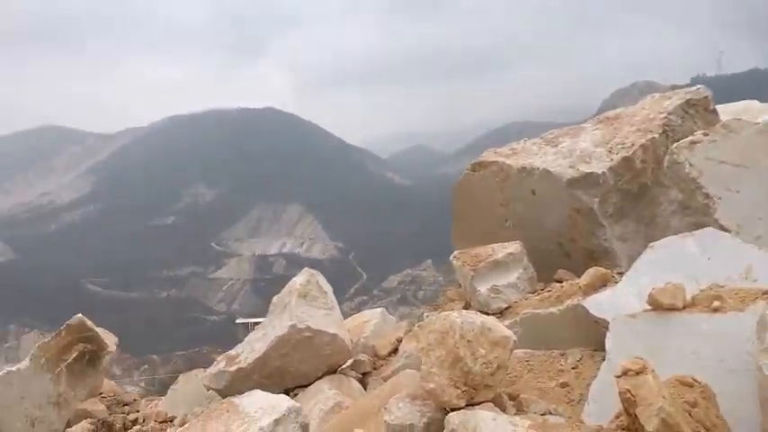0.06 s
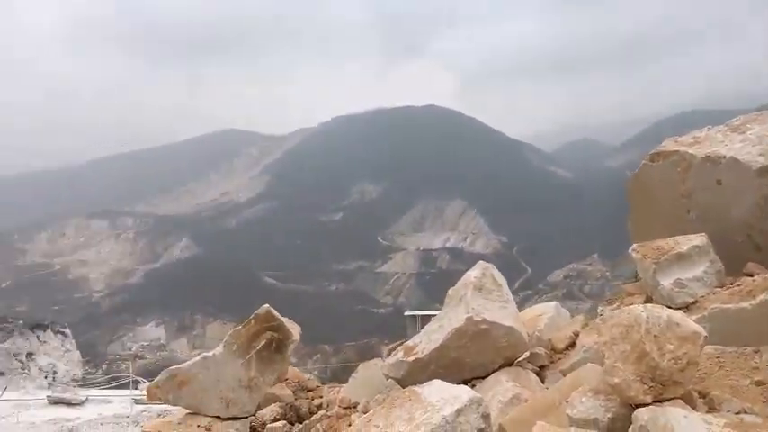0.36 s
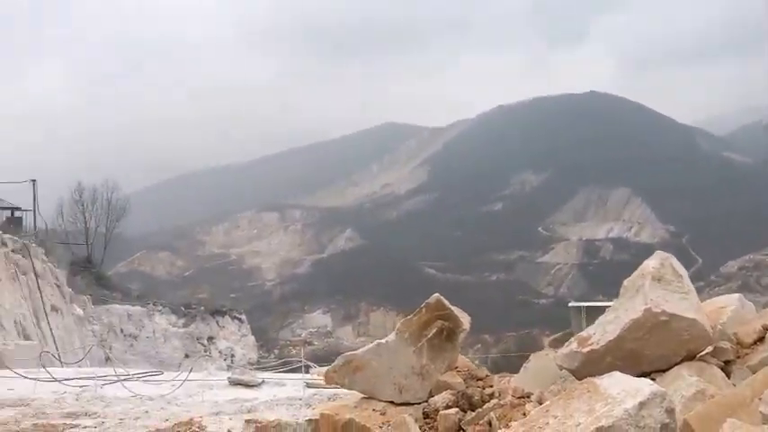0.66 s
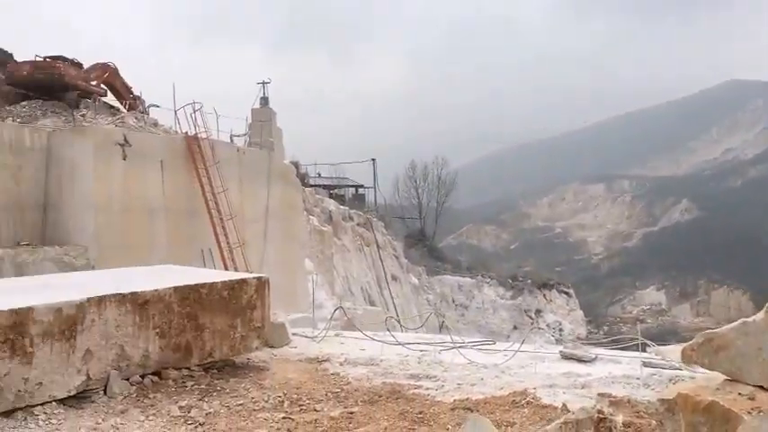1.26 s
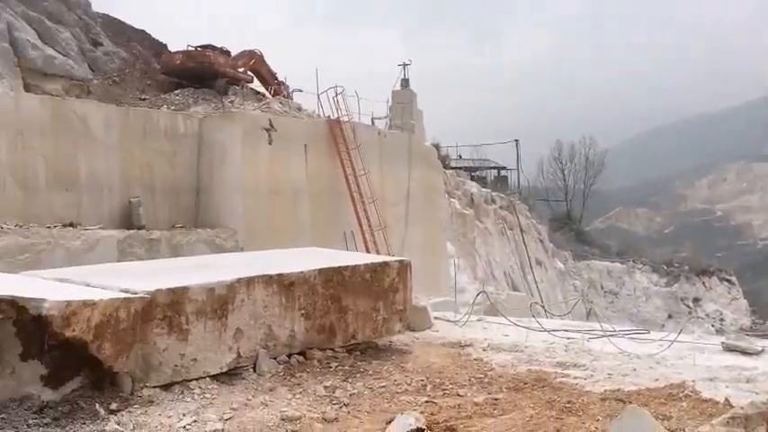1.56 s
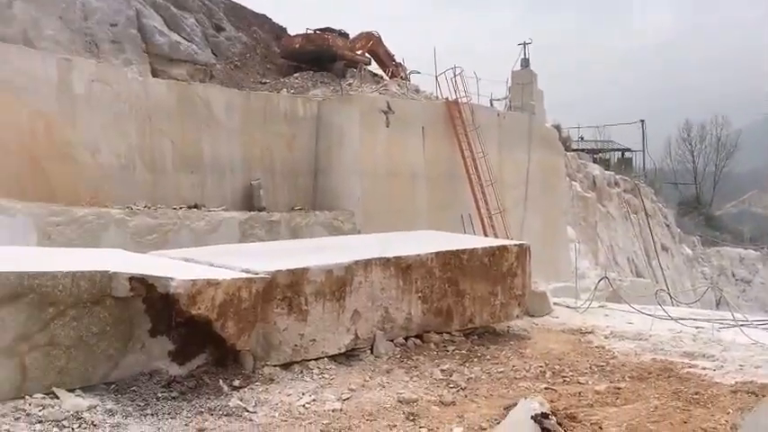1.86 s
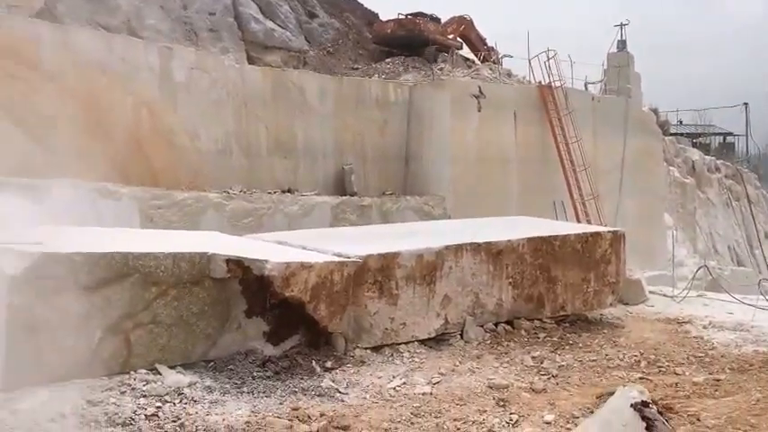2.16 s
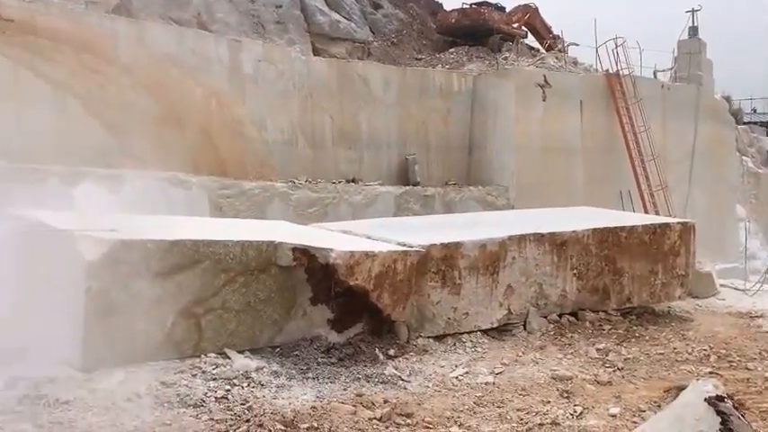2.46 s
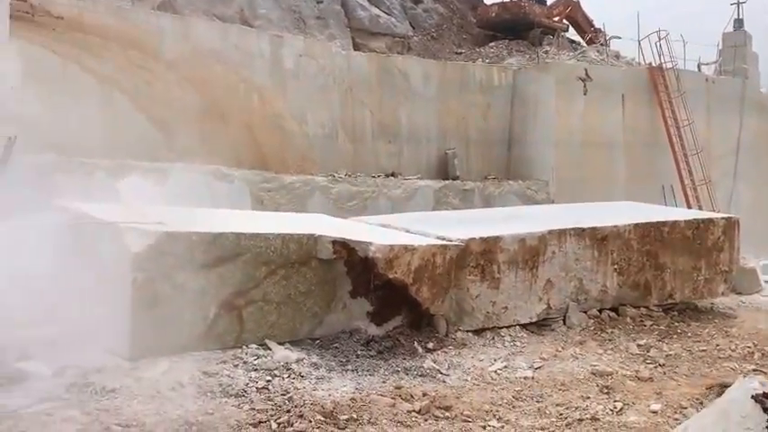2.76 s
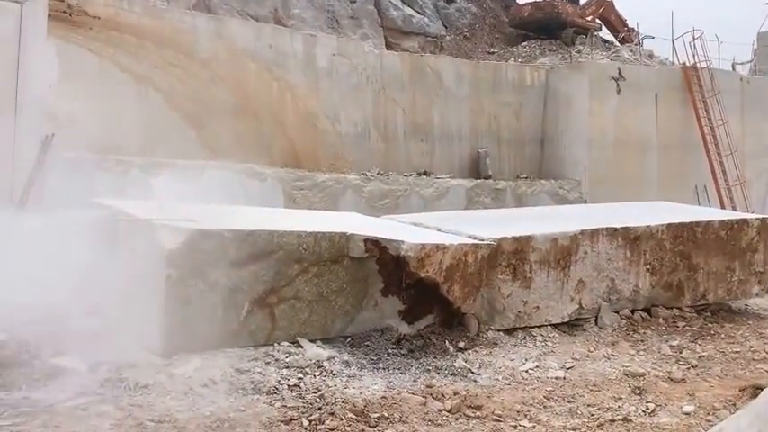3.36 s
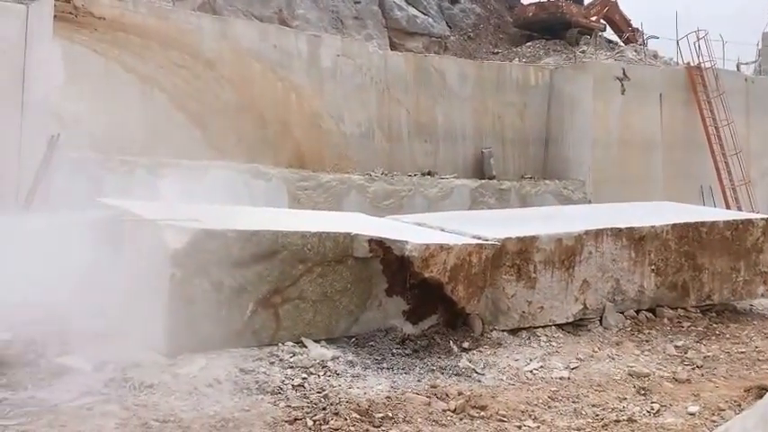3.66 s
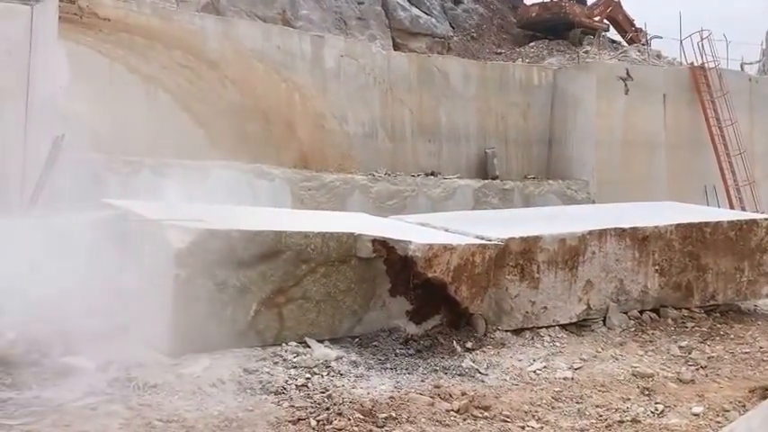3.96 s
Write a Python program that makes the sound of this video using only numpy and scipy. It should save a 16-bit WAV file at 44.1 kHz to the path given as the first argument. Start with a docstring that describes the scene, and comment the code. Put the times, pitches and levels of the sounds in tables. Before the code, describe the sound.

Stone-cutting machines roar throughout in an open quarry, heavy motors throbbing about three times a second over hum and wind rumble. A two-toned saw whine swells and fades, stronger from about 2 seconds. Between 0.7 and 2 seconds the spray hiss grows louder and brighter as the microphone turns. A brief low note swells just after 2 seconds, and the saw grinds slightly harder near 2.5 and 3 seconds.

```python
"""Stone-cutting machines run in an open quarry. From the start two heavy drives at slightly different
speeds beat against each other, the saw whines over the broadband roar of the cut, frames hum and wind
rumbles; now and then the treble drops out for an instant. As the microphone turns towards the cut,
the hiss of its spray grows louder and brighter. Just after 2 s a low note swells and fades, then the
saw bites harder twice, and near 3.3 s a speck of grit ticks."""
import sys
import numpy as np
from scipy import signal
from scipy.fft import rfft, irfft, next_fast_len
from scipy.io import wavfile
from scipy.ndimage import uniform_filter1d, map_coordinates

SR = 44100
rng = np.random.default_rng(int(sys.argv[2]) if len(sys.argv) > 2 else 0)


def wav_out(sig):
    """Save sig, one row per channel (or a flat mono array), as 16-bit PCM at SR to the path in sys.argv[1]."""
    wavfile.write(sys.argv[1], SR, np.round(np.clip(np.atleast_2d(sig).T, -1, 1) * 32767).astype(np.int16))


N = 176400

DRIVE_HZ, BEAT_HZ, IN_STEP_S = 39.55, 2.96, .19
# Harmonics of the slower and the faster drive: order, level/dB between chugs
SLOW_HARMONICS = [(1, -36), (2, -45), (4, -57)]
FAST_HARMONICS = [(1, -36.3), (3, -58), (5, -58)]
def drives():
    """Beating: two drives fall in and out of step at the difference of their frequencies."""
    out = np.zeros(N)
    for hz, harmonics in (DRIVE_HZ, SLOW_HARMONICS), (DRIVE_HZ + BEAT_HZ, FAST_HARMONICS):
        phase = 2 * np.pi * hz * (clock() - IN_STEP_S) + .033 * wobble(5.47)
        for order, db in harmonics:
            out += np.sqrt(2) * amp(db + .5 * wobble(22)) * np.cos(order * phase)
    return out * amp(chug_db())


# Chugs of the drives: t/s, lift/dB
CHUGS = [(.2, 6), (.45, 7), (.555, 5), (.812, 8.5), (.91, 6.5), (1.17, 8.5), (1.53, 4), (1.64, 6.5),
         (1.779, 10.5), (1.875, 3.5), (2.159, 10), (2.26, 6), (2.52, 4.5), (2.63, 9.5), (2.87, 3),
         (3.16, 2), (3.25, 5), (3.61, 7), (3.69, 11.5), (3.87, 4.5), (3.965, 6.5)]
def chug_db():
    """Amplitude modulation: short lifts of the bass, in dB, break the throb into chugs."""
    return sum(db * gaussian(clock(), s, width=.031) for s, db in CHUGS)


# The cut as the microphone turns to it: t/s, roar level/dB, hiss level/dB before treble shading
FACING = [(0, -42, -54), (.7, -42, -53.5), (1.3, -41, -51.5), (2.1, -40, -51), (2.9, -40, -50.5),
          (4, -39, -51)]
# Spectra of the roar and of the spray: f/Hz, relative spectral level/dB
ROAR_SPECTRUM = [(100, -13.5), (170, 0.5), (210, -3.5), (270, 1), (335, 1.5), (420, -5), (620, -4.5),
                 (780, -8.5), (900, -4), (1090, -6.5), (1260, -4.5), (1420, -7), (1750, -7), (2100, -11.5),
                 (2480, -14.5), (2750, -20.5), (4000, -24), (5000, -41), (9000, -78)]
SPRAY_SPECTRUM = [(1200, -3.5), (2700, 1.5), (3800, 1), (4500, 1), (4900, -2.5), (5600, 0.5), (6900, 0),
                  (7600, -2.5), (8400, -1), (9800, -4.5), (10350, -7.5), (10900, -4.5), (12200, -6),
                  (13500, -10.5), (15700, -14.5)]
def cutting():
    """Directivity: ground stone roars and spray hisses, louder and brighter when faced."""
    roar_db, hiss_db = curves(FACING)
    roar = amp(roar_db + .2 * wobble(18)) * rock_echoes(rush(ROAR_SPECTRUM, patchy_db=.8))
    hiss = amp(hiss_db) * rock_echoes(rush(SPRAY_SPECTRUM, patchy_db=1.5))
    off_axis_db = hiss_db - hiss_db.max()
    hiss += (amp(.62 * off_axis_db) - 1) * treble(hiss, edge_hz=3700, order=16)
    top_db = .22 * off_axis_db + .8 * wobble(7)
    return roar + hiss + (amp(top_db) - 1) * treble(hiss, edge_hz=5700, order=6)


# The two main tones of the saw: f/Hz
SAW_HZ = [921.5, 989.3]
# Envelopes of the lower and the upper tone: t/s, level/dB
LOW_ENVELOPE = [(0, -56), (.35, -52.5), (.65, -55), (1.1, -48.5), (1.8, -52.5), (2.02, -43), (2.25, -46),
                (2.68, -52), (3.05, -44), (3.25, -48), (3.7, -56), (4, -46.5)]
HIGH_ENVELOPE = [(0, -54), (.7, -55.5), (.97, -59), (1.3, -49), (1.8, -56), (1.96, -43.5), (2.1, -64),
                 (2.53, -48), (2.8, -60), (3.1, -49), (3.45, -61), (3.68, -47.5), (4, -64)]
# Fainter tones of the cut: f/Hz, level/dB relative to the roar
FAINT_PARTIALS = [(1147, -20.5), (1237, -16.5), (1252, -25), (1616, -19), (1822, -26), (2222, -28.5),
                  (3694, -31)]
def saw_whine():
    """Resonance: the saw sings in the cut on two tones that swell and fade, and on fainter ones."""
    main = faint = 0
    for hz, envelope in zip(SAW_HZ, (LOW_ENVELOPE, HIGH_ENVELOPE)):
        gain = amp(curves(envelope)[0])
        main += gain * tone(hz, drift_rad=.45, drift_rate=11, waver_db=1, waver_rate=21)
    for hz, db in FAINT_PARTIALS:
        faint += amp(db) * tone(hz, drift_rad=1, drift_rate=13, waver_db=.5, waver_rate=7.7)
    roar_db = curves(FACING)[0]
    return main + amp(roar_db) * faint


# The saw bites harder: t/s, lift/dB
BITES = [(2.45, 3.5), (3.05, 2.5)]
# Resonances of the cut: f/Hz, half width/Hz, level/dB when fully faced and between bites
CUT_RESONANCES = [(680, 112, -52.5), (1251, 36, -51.5), (2146, 350, -54)]
def grinding():
    """Noise-driven resonance: hollow bands stand out as the cut is faced and swell with each bite."""
    roar_db = curves(FACING)[0]
    off_axis_db = 2.5 * (roar_db - roar_db.max())
    bite_db = sum(db * gaussian(clock(), s, width=.06) for s, db in BITES)
    bands = sum(amp(db) * noise_band(hz, width) for hz, width, db in CUT_RESONANCES)
    return bands * amp(off_axis_db + bite_db)


# Tones of further motors and of the machine frames: f/Hz, level/dB
MOTOR_TONES = [(50.6, -47.5), (53, -52), (62.6, -46), (75, -49), (106, -48.5), (137.5, -54)]
FRAME_TONES = [(174.8, -51.5), (190, -53), (237, -63), (250.4, -54.5), (257, -55), (273.5, -49),
               (290, -64.5), (317.4, -55.5), (527.6, -58.5), (593.5, -61.5), (672.9, -65.5), (823.6, -59)]
def hum():
    """Forced vibration: motors give steady low tones, the machine frames less steady ones."""
    motors = sum(amp(db) * tone(hz, drift_rad=.21, drift_rate=4.7, waver_db=2.5, waver_rate=4.37)
                 for hz, db in MOTOR_TONES)
    frames = sum(amp(db) * tone(hz, drift_rad=.66, drift_rate=6, waver_db=2, waver_rate=7)
                 for hz, db in FRAME_TONES)
    return motors + frames


# Rumble of wind and machinery: f/Hz, relative spectral level/dB
RUMBLE_SPECTRUM = [(15, -27), (24, -42), (33, -33), (50, -6), (75, -2.5), (110, -6), (145, -13.5),
                   (220, -26.5), (500, -40), (1500, -79)]
def rumble(level_db=-36.3, gust_db=1.0, throb_db=2.3, chug_share=.5):
    """Modulated noise: wind and machinery rumble, more so with the drives in step and in each chug."""
    throb = np.cos(2 * np.pi * BEAT_HZ * (clock() - IN_STEP_S))
    lift_db = gust_db * wobble(25) + throb_db * throb + chug_share * chug_db()
    return amp(level_db) * unit(rush(RUMBLE_SPECTRUM, patchy_db=-.5) * amp(lift_db))


def boom(at_s=2.072, hz=219, level_db=-35):
    """Tone burst: a low note swells and fades once under a Gaussian envelope."""
    carrier = np.sqrt(2) * np.sin(2 * np.pi * hz * clock())
    return amp(level_db) * gaussian(clock(), at_s, width=.036) * carrier


def grit_tick(at_s=3.282, level_db=-41.5, t60_s=.008):
    """Damped transient: a speck of grit near the microphone gives a bright, fast-decaying click."""
    age = clock() - at_s
    envelope = amp(level_db - 60 * np.abs(age) / t60_s) * (age > 0)
    return envelope * noise_band(11500, width_hz=2200)


def rock_echoes(x, ripple_db=1.76, spacing_hz=45.44):
    """Interference: echoes from the rock faces ripple the spectrum; the result has rms 1."""
    knots = ripple_db * rng.standard_normal(4096)
    return unit(filtered(x, lambda f: amp(map_coordinates(knots, [f / spacing_hz], mode="mirror"))))


def tone(hz, drift_rad, drift_rate, waver_db, waver_rate):
    """Scintillation: a tone of rms 1 wavers in phase and level on its way through moving air."""
    phase = 2 * np.pi * (hz * clock() + rng.random()) + drift_rad * wobble(drift_rate)
    return unit(np.sin(phase) * amp(waver_db * wobble(waver_rate)))


def rush(spectrum, patchy_db):
    """Spectral shaping: coloured noise of rms 1, its gain patchy in time and frequency."""
    cells = signal.stft(rng.standard_normal(N), nperseg=512)[2]
    patches = uniform_filter1d(rng.standard_normal(cells.shape), size=5, axis=0)
    patches = uniform_filter1d(patches, size=14, axis=1)
    noise = signal.istft(cells * amp(patchy_db * unit(patches)), nperseg=512)[1][:N]
    hz, db = np.transpose(spectrum)
    return unit(filtered(noise, lambda f: amp(np.interp(np.log(f + 1), np.log(hz), db))))


def noise_band(hz, width_hz):
    """Band-pass filtering: noise of rms 1 around hz."""
    return unit(filtered(rng.standard_normal(N), lambda f: gaussian(f, hz, width_hz)))


def treble(x, edge_hz, order):
    """High-pass filtering: the part of x above an edge."""
    return filtered(x, lambda f: 1 - 1 / (1 + (f / edge_hz) ** order))


def filtered(x, response):
    """Linear filtering: the spectrum of x times a frequency response."""
    size = next_fast_len(N + SR // 2)
    return irfft(rfft(x, size) * response(np.fft.rfftfreq(size, 1 / SR)), size)[:N]


def wobble(rate):
    """Spline interpolation: a smooth random curve, rate knots a second."""
    return map_coordinates(rng.standard_normal(1024), [clock() * rate], mode="mirror")


def curves(rows):
    """Linear interpolation: one value per sample for each column after the time."""
    times, *columns = np.transpose(rows)
    return [np.interp(clock(), times, column) for column in columns]


def gaussian(x, centre, width):
    """Gaussian window: 1 at the centre, 1/e one width away."""
    return np.exp(-((x - centre) / width) ** 2)


def amp(db):
    """Decibel law: level to amplitude ratio."""
    return 10 ** (np.asarray(db) / 20)


def unit(x):
    """Normalisation to rms 1."""
    return x / np.sqrt(np.mean(x ** 2) + 1e-20)


def clock():
    """Uniform sampling: t/s of every sample."""
    return np.arange(N) / SR


def scene():
    """Superposition: machines and wind add at one microphone."""
    return (drives() + cutting() + saw_whine() + grinding() + hum() + rumble() + boom() + grit_tick())[None]


# Treble dropouts: t/s, duration/s, depth/dB, lower edge f/Hz
DROPOUTS = [(.411, .016, 17, 4200), (.551, .028, 20, 4300), (1.185, .034, 30, 4400),
            (1.306, .009, 10, 3400), (1.586, .011, 12, 3900), (1.714, .009, 12, 3700),
            (1.829, .026, 24, 4500), (2.288, .011, 20, 3400), (2.587, .009, 12, 3300),
            (3.119, .011, 11, 3700), (3.334, .01, 12, 3600), (3.546, .009, 14, 4000),
            (3.717, .009, 15, 3300), (3.781, .01, 15, 3000)]
def record(dry, low_cut_hz=22.2, top_hz=15720):
    """Band limiting: the treble dips briefly, the microphone rolls off deep bass, the top is cut."""
    x = dry[0]
    for s, duration, depth_db, edge_hz in DROPOUTS:
        gate = np.exp(-np.abs(2 * (clock() - s) / duration) ** 6)
        x = x - gate * (1 - amp(-depth_db)) * treble(x, edge_hz, order=16)
    return filtered(x, lambda f: (f < top_hz) * (1 - 1 / (1 + (f / low_cut_hz) ** 10)))[None]


dry = scene()
out = record(dry)
wav_out(out)
```